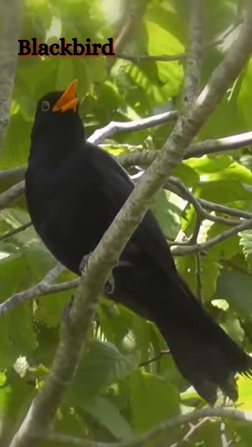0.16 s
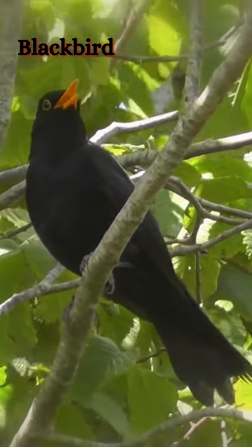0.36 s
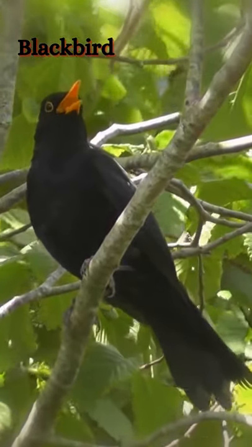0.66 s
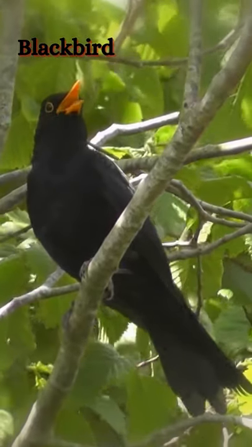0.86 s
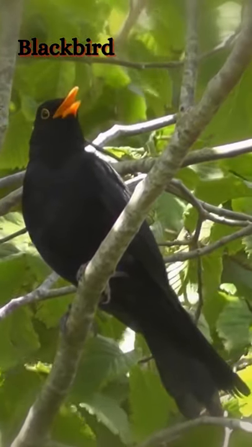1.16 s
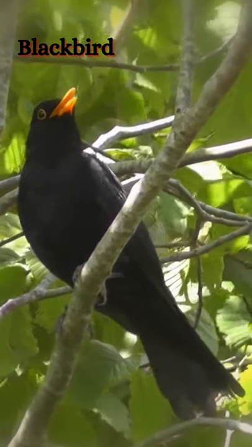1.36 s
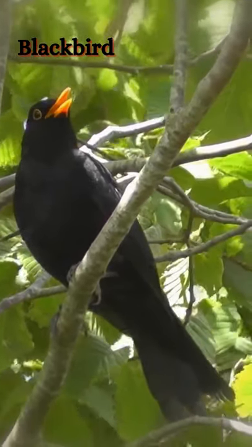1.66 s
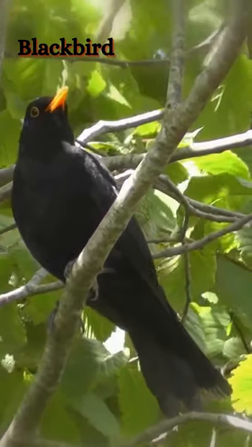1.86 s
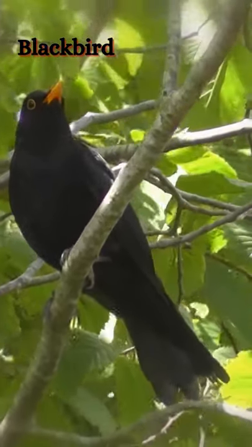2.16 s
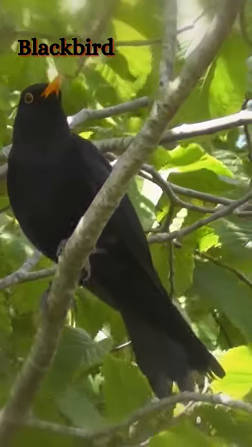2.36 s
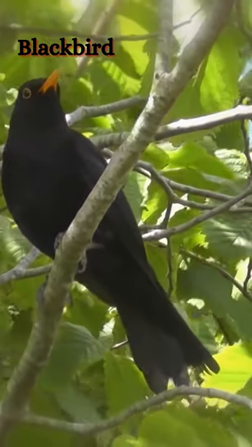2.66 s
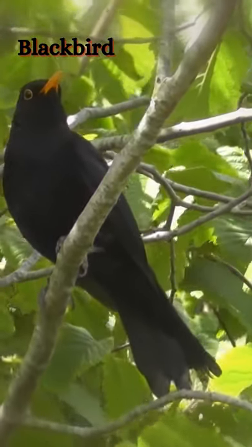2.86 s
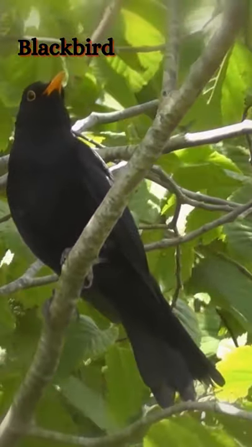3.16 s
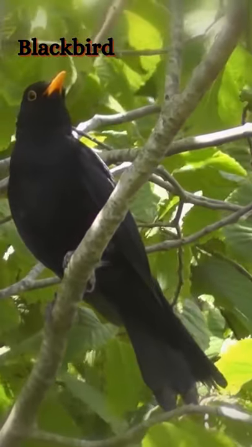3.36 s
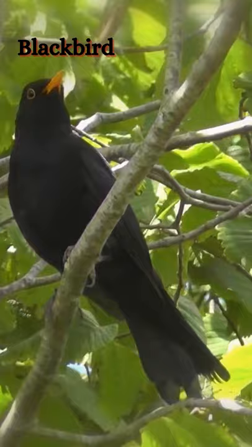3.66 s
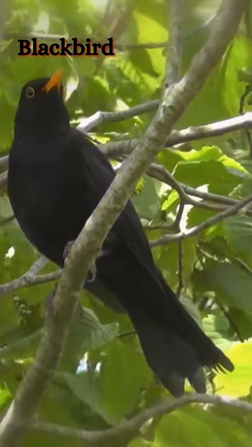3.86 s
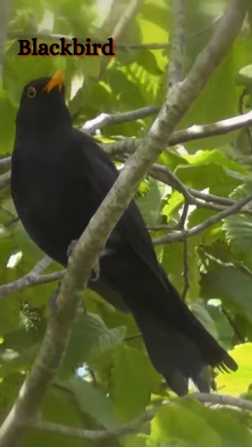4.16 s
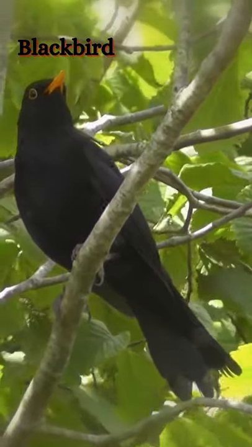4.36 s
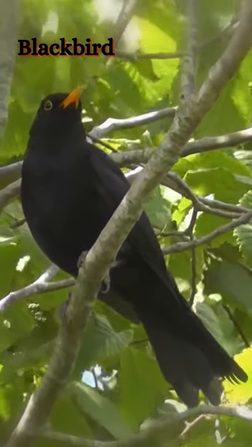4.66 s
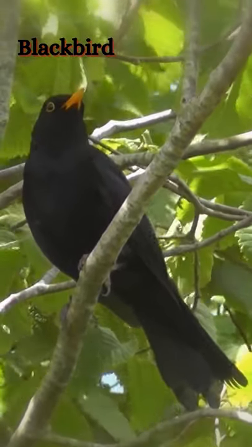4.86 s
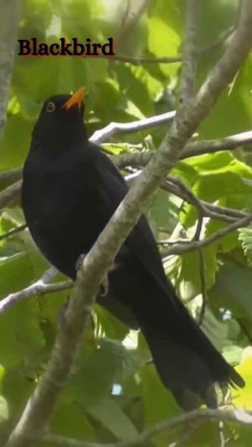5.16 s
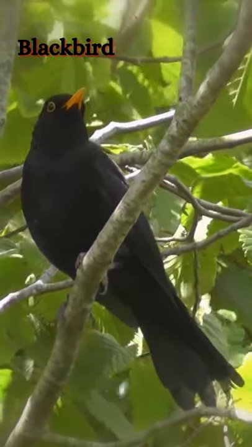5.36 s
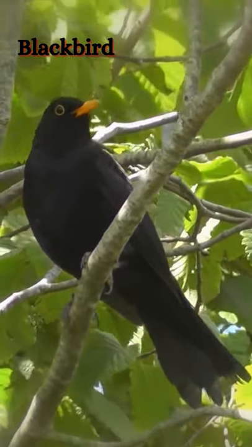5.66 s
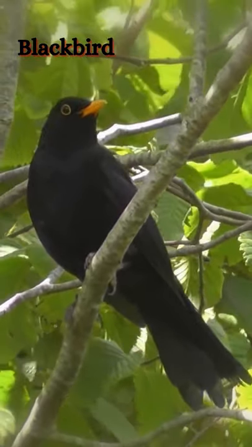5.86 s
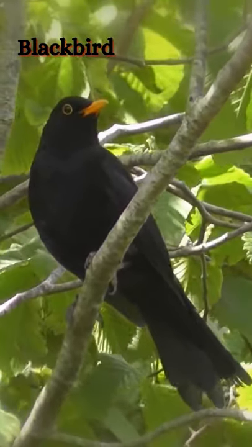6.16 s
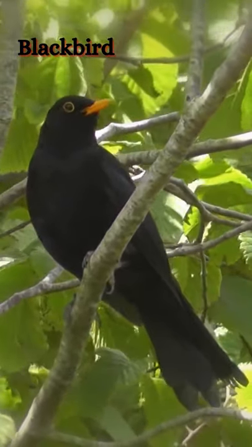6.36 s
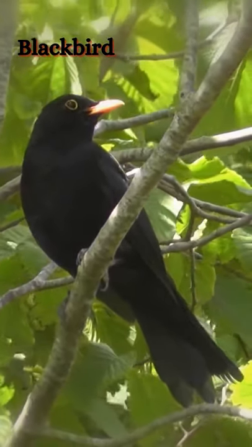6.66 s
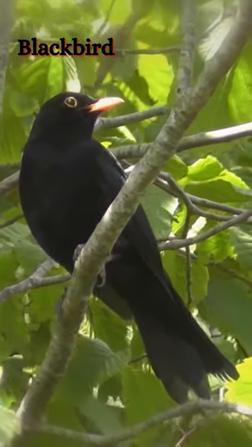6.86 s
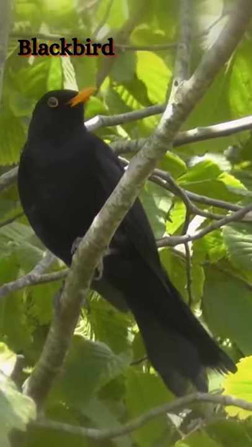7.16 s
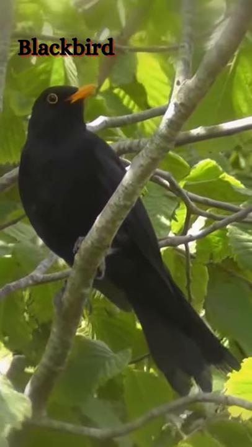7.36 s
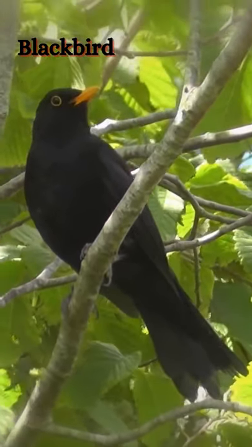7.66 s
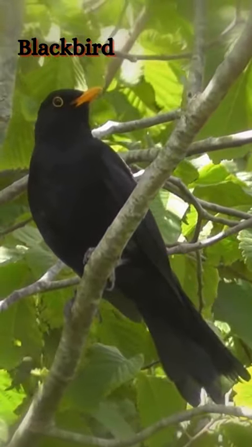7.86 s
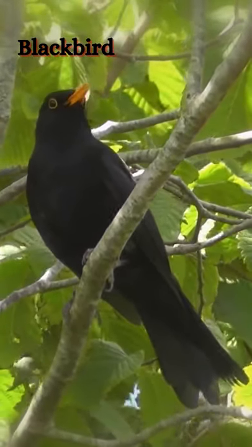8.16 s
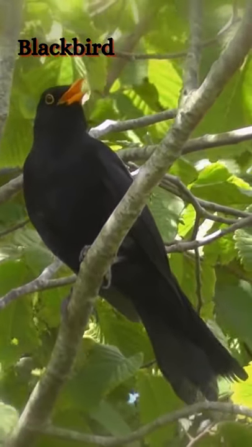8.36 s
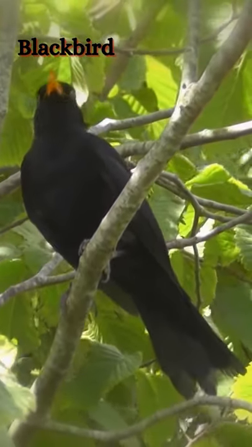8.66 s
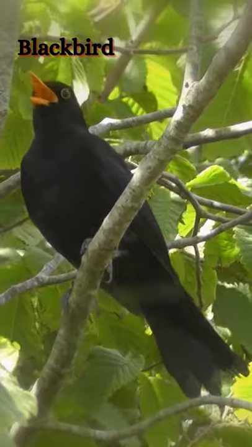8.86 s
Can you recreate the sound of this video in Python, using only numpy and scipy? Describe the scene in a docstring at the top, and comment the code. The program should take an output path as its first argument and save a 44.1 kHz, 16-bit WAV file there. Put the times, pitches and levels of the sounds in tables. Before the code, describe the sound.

A male blackbird sings from a branch close to the microphone. A mellow whistle with a fluttering upper voice breaks into buzzes, clicks and squeaky notes; after a short gap comes a warble, a long pure whistle, a stuttering run and a thin chirp. During the pause small birds call with echo deep in the wood over a soft hush, before a quieter raspy phrase starts.

```python
"""A blackbird sings from a branch close by: fluty whistles, warbles and buzzes from the two sides of its syrinx,
then a thin chirp with fainter repeats. Each note is a swept sine with weak overtones and a breath of hiss;
branches scatter it. Small birds answer from deeper in the wood with sliding tones, mostly heard as echo.
Beneath lie a soft outdoor hush and breeze of coloured noise, a faint far drone and a few low bumps."""
import sys
import numpy as np
from scipy import signal
from scipy.fft import rfft, irfft
from scipy.io import wavfile
from scipy.ndimage import uniform_filter1d, map_coordinates

SR = 44100
rng = np.random.default_rng(int(sys.argv[2]) if len(sys.argv) > 2 else 0)


def persist_wave(psi):
    """Save psi, clipped to +-1, as 16-bit WAV."""
    counts = np.round(np.clip(psi, -1, 1) * 32767).astype(np.int16)
    wavfile.write(sys.argv[1], SR, np.atleast_2d(counts).T)


N = 397341
TIME = np.arange(N) / SR

# reverberation of the far wood: f/Hz, time to fall 60 dB/s
FAR_DECAY = [(3000, 1.7), (5000, 1.62), (8000, 0.46)]


def gain_of(db):
    """Decibels to gain."""
    return 10 ** (np.asarray(db) / 20)


def evened(x):
    """Scales to rms 1."""
    return x / np.sqrt(np.mean(x ** 2) + 1e-20)


def read(points, hz):
    """Reads a table on a log-frequency axis."""
    f, value = np.transpose(points)
    return np.interp(np.log(hz + 1), np.log(f + 1), value)


def add(mix, s, sound):
    """Adds a sound to the mix at time s, cutting whatever falls outside it."""
    start = round(s * SR)
    sound = sound[max(-start, 0):]
    part = mix[max(start, 0):][:len(sound)]
    part += sound[:len(part)]


def coloured(x, colour):
    """Filters by a table of dB over frequency."""
    n = x.shape[-1]
    hz = np.fft.rfftfreq(n, 1 / SR)
    return irfft(rfft(x) * gain_of(read(colour, hz)), n)


def wander(n, rate):
    """Smooth chance of rms near 1, changing about rate times a second."""
    points = rng.standard_normal(256)
    return map_coordinates(points, [np.arange(n) * rate / SR], order=3, mode="mirror")


def flutter(size):
    """Random swing of rms 1, smoothed twice over size samples."""
    smooth = uniform_filter1d(rng.standard_normal(N), size=size)
    return evened(uniform_filter1d(smooth, size=size))


def clock(length):
    """Time within a note, in seconds and as a share of its length."""
    t = np.arange(0, max(length, .003), 1 / SR)
    return t, t / t[-1]


def dome(u):
    """1 at both ends of a note, 0 in its middle."""
    return (2 * u - 1) ** 2


def bow(u, from_hz, middle_hz, to_hz):
    """A smooth pitch arc through the start, middle and end of a note."""
    straight = from_hz + (to_hz - from_hz) * u
    return straight + (middle_hz - (from_hz + to_hz) / 2) * (1 - dome(u))


def fade(t, edge):
    """Opens and shuts a note within edge seconds."""
    return np.sin(np.pi / 2 * np.clip(np.minimum(t, t[-1] - t) / edge, 0, 1)) ** 2


def ramps(t, attack, release):
    """Straight-line attack and release, in seconds."""
    return np.clip(t / attack, 0, 1) * np.clip((t[-1] - t) / release, 0, 1)


def syrinx(t, hz, db, overtone_db, third_db=-6, fourth_db=-24, waver=0.0064, edge=0.002):
    """A nearly pure tone: the throat lets only weak overtones out."""
    throat_top_hz = 12300  # overtones die out above this
    hz = hz * (1 + waver * wander(len(t), 300.5))
    phase = 2 * np.pi * np.cumsum(hz) / SR
    overtones = 0
    for k, level in enumerate([0, third_db, fourth_db], 2):
        passed = (k * hz < SR / 2) / (1 + (k * hz / throat_top_hz) ** 20)
        overtones = overtones + gain_of(level) * np.sin(k * phase) * passed
    tone = np.sin(phase) + gain_of(overtone_db) * overtones
    return np.sqrt(2) * gain_of(db) * tone * fade(t, min(edge, t[-1] / 4))


def scatter(x, decay, onset, likeness=0.99):
    """Countless small echoes that swell and die, nearly alike in both channels."""
    taps = rng.standard_normal((3, SR)) * (rng.random((3, SR)) < 3000 / SR)
    taps = np.sqrt(likeness) * taps[0] + np.sqrt(1 - likeness) * taps[1:]
    hz, t, z = signal.stft(taps * (1 - np.exp(-TIME[:SR] / onset)), SR, nperseg=256)
    dying = gain_of(-60 * t / read(decay, hz)[:, None])
    tail = signal.istft(z * dying, SR, nperseg=256)[1]
    return signal.fftconvolve(x[None], tail / np.linalg.norm(tail[0]), axes=1)[:, :N]


def echo(x, delay, db):
    """One reflection."""
    return gain_of(db) * np.interp(TIME - delay, TIME, x, left=0)


def air(colour, patchy_db):
    """Stereo noise of rms 1 with drifting patches in time and frequency."""
    # left-right likeness of the air noise: f/Hz, correlation
    alike = [(50, 0.82), (300, 0.99), (800, 0.89), (2000, 0.69), (5000, 1), (9000, 0.089), (14000, 0.3)]
    frames, hz = N // 512 + 5, np.fft.rfftfreq(2048, 1 / SR)
    a, b, c, d, patches = rng.standard_normal((frames, len(hz), 5)).T
    patches = uniform_filter1d(patches, size=12, axis=0)
    patches = evened(uniform_filter1d(patches, size=10, axis=1))
    same = np.clip(read(alike, hz), -1, 1)[:, None]
    left = a + 1j * b
    right = same * left + np.sqrt(1 - same ** 2) * (c + 1j * d)
    z = np.array([left, right]) * gain_of(read(colour, hz)[:, None] + patchy_db * patches)
    return evened(signal.istft(z, nperseg=2048, noverlap=1536)[1][:, :N])


def outdoors():
    """Coloured noises: a hush, a low breeze that swells in gusts and the blur of very distant birdsong."""
    # spectra of the hush, the breeze and the distant birds: f/Hz, relative level/dB
    hush_colour = [(15, -35.5), (25, 6.5), (55, -7), (107, -3), (281, 3), (349, -22.5), (703, -6),
                   (1110, -11), (1660, -13.5), (2060, -17), (3090, -13), (3930, -18.5), (5580, -15),
                   (9550, -31.5), (15500, -29.5)]
    breeze_colour = [(60, -30.5), (150, -7), (270, -0.5), (450, -1), (750, -6.5), (1200, -17.5),
                     (2500, -45)]
    chorus_colour = [(2000, -23.5), (3300, -20), (4500, 5), (6000, 0), (7200, 5), (8500, -30.5),
                     (12000, -31.5)]
    # gusts: t/s, half width/s, rise/dB
    gusts = [(3.85, 0.23, 5.5), (4.35, 0.2, 10), (6.65, 0.54, 5), (8.302, 1, 3.5)]
    hush_db, breeze_db, chorus_db = -49, -50, -60.5
    gusts_db = sum(db * np.exp(-((TIME - s) / width) ** 2) for s, width, db in gusts)
    breeze = gain_of(breeze_db + gusts_db) * air(breeze_colour, patchy_db=2.0)
    hush = gain_of(hush_db) * air(hush_colour, patchy_db=2.5)
    chorus = gain_of(chorus_db) * air(chorus_colour, patchy_db=6.5)
    return hush + breeze + chorus


def rumble():
    """The wavering drone, a sine with its third harmonic, and dull bumps of low noise."""
    # a far drone holds one pitch after another: from t/s, f/Hz, level/dB
    drone = [(0, 53, -50), (.8, 46, -62), (2.152, 73, -58), (3.002, 71.4, -55.5), (4.6, 70, -60.5),
             (5.8, 70.5, -58.5), (6.75, 44, -59.5), (7.3, 55, -59.5)]
    # soft low bumps: t/s, length/s, peak level/dB
    bumps = [(2.977, 0.065, -45.5), (3.297, 0.07, -43.5), (4.872, 0.15, -48), (5.018, 0.061, -38),
             (5.64, 0.39, -48), (8.32, 0.12, -49), (8.776, 0.15, -48.5)]
    # spectrum of the bumps: f/Hz, relative level/dB
    bump_colour = [(20, -44), (40, -27), (60, -14), (100, -13.5), (150, -20), (300, -25.5), (900, -68)]
    s, hz, db = np.transpose(drone)
    step = np.searchsorted(s[1:], TIME)
    hz, db = uniform_filter1d(np.array([hz[step], db[step]]), size=4000)  # soften the steps
    phase = 2 * np.pi * np.cumsum(hz * (1 + .012 * wander(N, 5.6))) / SR
    level = gain_of(db + 1.5 * wander(N, 5.2))
    low = np.sqrt(2) * level * (np.sin(phase) + gain_of(-6) * np.sin(3 * phase))
    swell = np.zeros(N)
    for start, length, level_db in bumps:
        add(swell, start, gain_of(level_db) * np.hanning(round(length * SR)))
    return low + swell * evened(coloured(rng.standard_normal(N), bump_colour))


def slur(length, from_hz, to_hz, settle, db, waver=0.0058):
    """A small bird's stroke slides quickly and settles on its last pitch."""
    t, u = clock(length)
    detune = 1 + 0.00418 * rng.standard_normal()
    hz = (to_hz + (from_hz - to_hz) * np.exp(-t / settle)) * detune
    return syrinx(t, hz, db, overtone_db=-38.5, waver=waver, edge=0.0022)


def far_series(count=8):
    """A far bird's even series of count down-sweeps, each returned by three crisp echoes and a long tail."""
    # crisp echoes: delay/s, level/dB
    crisp_echoes = [(0.0481, 0.5), (0.0663, -3), (.122, -8)]
    start_s, spacing_s, sweep_s = 7.704, .0926, .04
    top_hz, end_hz = 5720, 3800
    sweep_db, dome_db = -49.5, 2  # level ahead of the flutter
    song, (t, u) = np.zeros(N), clock(sweep_s)
    for k in range(count):
        level = sweep_db - dome_db * dome(u) + 3 * wander(len(t), 200)
        sweep = syrinx(t, top_hz * (end_hz / top_hz) ** u, level, overtone_db=-37)
        add(song, start_s + k * spacing_s, sweep)
    crisp = song + sum(echo(song, delay, db) for delay, db in crisp_echoes)
    crisp = crisp * gain_of(2.4 * flutter(400) - 2)
    return crisp + gain_of(-1.5) * scatter(song, FAR_DECAY, onset=0.0046)


def far_birds():
    """Tumbles, sliding strokes and held whistles; the way through the leaves makes them flutter."""
    # levels in these tables stand ahead of the echoes and the flutter
    # steep sliding strokes, most of them falling: t/s, length/s, from f/Hz, to f/Hz, level/dB
    tumbles = [(2.037, 0.083, 7000, 5890, -48.5), (2.075, 0.062, 6030, 3350, -54),
               (2.109, .016, 6350, 3920, -48.5), (2.419, 0.065, 6800, 4550, -48.5),
               (2.452, 0.066, 6900, 4710, -44.5), (2.53, .03, 5620, 4190, -49.5),
               (2.552, 0.017, 4870, 5620, -50), (2.62, 0.018, 5000, 5580, -56),
               (2.482, 0.03, 6740, 3930, -48.5), (2.795, 0.061, 7000, 6020, -45.5),
               (2.826, 0.051, 4530, 3320, -49), (2.849, 0.026, 6600, 3940, -48),
               (3.169, 0.084, 6300, 4110, -50.5), (3.203, 0.051, 6420, 3866, -45),
               (3.505, 0.018, 6640, 4940, -53), (3.53, 0.089, 6620, 4855, -43.5),
               (4.307, 0.024, 6450, 3900, -45.5), (4.342, 0.0204, 6220, 3960, -47),
               (4.439, 0.048, 6200, 4550, -47), (4.5, 0.033, 5200, 3950, -57),
               (4.817, 0.038, 5580, 4250, -54), (4.655, 0.026, 3190, 3960, -55.5),
               (4.663, 0.028, 3180, 2690, -70)]
    # sliding strokes, single or evenly repeated, some of the repeats being echoes:
    # t/s, number of strokes, spacing/s, from f/Hz, to f/Hz, level/dB
    slides = [(2.56, 1, 0.12, 5560, 4860, -56), (4.927, 2, 0.092, 5400, 6110, -54),
              (5.388, 4, 0.08, 5420, 6310, -54), (5.7, 2, 0.052, 5400, 3200, -55.5),
              (5.939, 4, 0.041, 7650, 6620, -56), (6.363, 1, .1, 6420, 7850, -56),
              (6.43, 2, 0.11, 3030, 3930, -59), (6.721, 2, 0.036, 3510, 4580, -56.5),
              (6.85, 3, 0.14, 3890, 2620, -59), (6.87, 5, 0.12, 8050, 5260, -58.5),]
    # whistles that drop onto a held pitch: t/s, length/s, held f/Hz, level/dB
    held = [(3.266, 0.18, 4590, -55.5), (3.421, .14, 4690, -57), (4.549, 0.24, 6890, -60),
            (4.754, 0.13, 4264, -53.5), (4.9, 0.29, 4265, -61.5), (5.205, 0.16, 6980, -57.5),
            (5.836, 0.1, 4174, -50), (6.603, 0.12, 5050, -50), (7.475, 0.2, 4944, -53.5)]
    tumble_settle_s = 0.008
    stroke_s, stroke_settle_s = 0.051, .033
    drop_ratio, drop_settle_s = 1.22, 0.011
    song = np.zeros(N)
    for s, length, from_hz, to_hz, db in tumbles:
        add(song, s, slur(length, from_hz, to_hz, tumble_settle_s, db, waver=.022))
    smear = scatter(song, [(3000, .07), (8000, .06)], onset=.001)[0]
    song = gain_of(-2.5) * song + gain_of(-4.5) * smear
    for s, strokes, spacing, from_hz, to_hz, db in slides:
        for k in range(round(strokes)):
            stroke = slur(stroke_s, from_hz, to_hz, stroke_settle_s, db, waver=0.0077)
            add(song, s + k * spacing, stroke)
    for s, length, hz, db in held:
        add(song, s, slur(length, drop_ratio * hz, hz, drop_settle_s, db))
    return song * gain_of(2 * flutter(200) - .5)


def thin_whistle():
    """A thin, very high slur from a nearer tree slides onto its pitch, swells and fades."""
    length_s, settle_s, fade_s = 0.32, 0.033, .09
    from_hz, to_hz = 8630, 8255
    peak_db, dome_db = -39.5, 15
    t, u = clock(length_s)
    tone = slur(length_s, from_hz, to_hz, settle_s, peak_db - dome_db * dome(u), waver=0.0028)
    return tone * np.clip((t[-1] - t) / fade_s, 0, 1)


def overtone(db):
    """The louder the note, the purer it is: its overtone drops 1.1 dB for each dB above -24."""
    return np.clip(-33 - 1.1 * (db + 24), -43, -19)


def shaken(t, hz, db, swing, rate, overtone_db):
    """A tremor of the syrinx shakes pitch and level; the wider it swings, the more ragged it gets."""
    rough = min(swing / 180, 1)  # fully ragged from a swing of 180 Hz
    uneven_rate = rate * (1 + 0.415 * rough * wander(len(t), rate))
    shake = np.sin(2 * np.pi * np.cumsum(uneven_rate) / SR)
    hz = hz + swing * (shake + .75 * rough * wander(len(t), 300))
    level = db + 0.7 * shake + 5.54 * rough * wander(len(t), 195.5)
    return syrinx(t, hz, level, overtone_db, third_db=-16.5, fourth_db=-28.5, edge=0.0072)


def sharp_notes():
    """Click-like falling flicks and hoarse, shaken squeaks that climb and level off."""
    # flicks: t/s, level at the start/dB
    flicks = [(0.349, -16.5), (.507, -20.5), (0.905, -39), (0.966, -38)]
    # squeaks: t/s, level/dB
    scratches = [(1.187, -35.5), (1.318, -35.5)]
    # two upstrokes and a ragged top: t after the start/s, length/s, from f/Hz, to f/Hz, level/dB, swing/Hz
    scratch_parts = [(0, 0.0208, 4550, 5600, -2, 70), (0.019, .017, 4190, 7080, 0.5, 90),
                     (0.027, .025, 6670, 6620, -1.5, 300)]
    flick_s, top_hz, end_hz = 0.00665, 6240, 3200
    song = np.zeros(N)
    for s, db in flicks:
        t, u = clock(flick_s)
        add(song, s, syrinx(t, top_hz + (end_hz - top_hz) * u, db - 6 * u, overtone_db=-21.5))
    for s, db in scratches:
        for after, length, from_hz, to_hz, part_db, swing in scratch_parts:
            t, u = clock(length)
            hz = from_hz + (to_hz - from_hz) * u
            add(song, s + after, shaken(t, hz, db + part_db, swing, rate=400, overtone_db=-13.5))
    return song


def thin_chirp():
    """A thin chirp that creeps up, grows louder and snaps down, then fainter echo-like repeats."""
    # the chirp and its repeats: t/s, length/s, level at the end/dB
    chirps = [(3.927, 0.045, -33), (3.979, 0.022, -36), (3.993, 0.018, -42), (4.027, 0.024, -39),
              (4.048, 0.034, -43), (4.094, .02, -48)]
    # pitch of a chirp: share of its length, f/Hz
    chirp_pitch = [(0, 6440), (.8, 7300), (1, 5800)]
    growth_db = 13.5
    song = np.zeros(N)
    for s, length, db in chirps:
        t, u = clock(length)
        hz = np.interp(u, *np.transpose(chirp_pitch))
        add(song, s, syrinx(t, hz, db + growth_db * (u - 1), overtone_db=-21))
    return song


def tsips():
    """Both sides of the syrinx sound at once: a near-steady low voice under one that dips and climbs back."""
    # calls: t/s, level of the low voice/dB
    calls = [(1.528, -29.5), (1.699, -31.5)]
    # pitch of the upper voice: t after the start/s, f/Hz
    upper = [(-.007, 7100), (.005, 5510), (0.034, 5800), (0.074, 5904)]
    low_hz, low_s, low_bow, upper_db = 4700, 0.0435, 0.02, -4.5
    song, (after, hz) = np.zeros(N), np.transpose(upper)
    for s, db in calls:
        t, u = clock(low_s)
        add(song, s, syrinx(t, low_hz * (1 + low_bow * dome(u)), db, overtone_db=-30))
        t, u = clock(after[-1] - after[0])
        upper_hz = np.interp(t + after[0], after, hz)
        add(song, s + after[0], syrinx(t, upper_hz, db + upper_db, overtone_db=-17.5, edge=0.0073))
    return song


def grates():
    """The tremor is so wide and quick that each burst spreads into a rasp."""
    # bursts: t/s, length/s, f/Hz, level/dB
    bursts = [(0.752, 0.026, 2444, -26), (0.776, 0.0282, 2570, -27), (0.805, 0.0344, 2743, -27),
              (8.485, 0.028, 2513, -33), (8.508, 0.03, 2820, -29.5), (8.531, 0.0273, 2830, -31),
              (8.553, 0.029, 2850, -32.5), (8.576, 0.026, 2787, -34.5)]
    # the pitch leaps and sinks: share of the burst, offset/Hz
    arch = [(0, -200), (.3, 171), (1, -170)]
    swing_hz, rate, jitter = 255, 190, 0.16  # rate in shakes per s
    throb_db, fade_db = -1.5, 5.5
    song = np.zeros(N)
    for s, length, hz, db in bursts:
        t, u = clock(length)
        shake = np.sin(2 * np.pi * np.cumsum(rate * (1 + jitter * wander(len(t), rate))) / SR)
        pitch = hz + np.interp(u, *np.transpose(arch)) + swing_hz * shake
        level = db + throb_db * shake - fade_db * (u - .5)
        add(song, s, syrinx(t, pitch, level, overtone_db=-25.5, third_db=-27, edge=0.0048))
    return song


def climb():
    """The opening buzz ends in pulses that run together as the shaking pitch shoots up."""
    start_s, length_s, pulses_per_s = .304, .031, 160
    low_hz, top_hz, peak_db = 3150, 7530, -28
    song, (t, u) = np.zeros(N), clock(length_s)
    cycle = t * pulses_per_s % 1
    hz = (low_hz + (top_hz - low_hz) * u ** 1.7) * (1 - 0.039 * np.sin(2 * np.pi * cycle))
    add(song, start_s, syrinx(t, hz, peak_db - 14 * (1 - u) * dome(cycle), overtone_db=-27))
    return song


def buzzes():
    """Notes on a straight glide, shaken by a tremor: slow is a vibrato, fast is a buzz."""
    # t/s, length/s, start f/Hz, end f/Hz, level/dB, swing/Hz, shakes per s
    notes = [ (0.045, 0.1, 4180, 4370, -47, 170, 170), (0.15, .15, 4180, 4150, -47.5, 330, 380),
             (0.102, 0.02, 2203, 2170, -26, 60, 170), (.125, 0.053, 2310, 2350, -42, 157, 145),
             (0.183, 0.124, 2375, 2360, -33, 116, 140), (0.195, 0.068, 2920, 2940, -34.5, 132, 110),
             (0.267, 0.024, 3130, 3090, -28.5, 101, 120), (0.288, .015, 2880, 3020, -26, 80, 120),
             (0.471, 0.02, 5080, 7520, -34, 170, 155), (0.968, 0.035, 2560, 2553, -37, 49.6, 100),
             (1.014, 0.077, 1720, 1610, -37.5, 99, 110), (1.065, 0.052, 1656, 1838, -36, 98, 93),
             (1.4, 0.037, 4280, 2630, -45.5, 250, 148), (3.102, 0.051, 1800, 1732, -35, 61.3, 110),
             (3.151, 0.034, 1763, 1707, -32, 60, 130), (3.609, 0.114, 2600, 2440, -37, 93, 36),
             (3.71, 0.09, 3070, 2780, -48, 71, 49), (3.714, 0.082, 1530, 1413, -38, 45, 53),
             (8.274, 0.076, 1630, 2104, -41, 25, 64), (8.439, 0.059, 2106, 2127, -38, 99.5, 120),
             (8.502, 0.09, 2290, 2343, -37, 109, 240), (8.594, 0.091, 2880, 2920, -47.5, 138, 150),
             (8.728, 0.17, 1784, 1853, -38.5, 82, 45)]
    song = np.zeros(N)
    for s, length, from_hz, to_hz, db, swing, rate in notes:
        t, u = clock(length)
        hz = from_hz + (to_hz - from_hz) * u
        add(song, s, shaken(t, hz, db, swing, rate, overtone_db=-25.5))
    return song


def warble():
    """One unbroken note on a sawtooth pitch: each tooth leaps up and slides down, slower than the last."""
    start_s, length_s = 2.801, .124
    low_hz, high_hz = 1704, 2434
    first_tooth_s, slowing, leap = .022, .887, 0.2  # leap: share of a tooth spent rising
    peak_db, dip_db = -22, 4  # loudest midway between low and high
    song, (t, u) = np.zeros(N), clock(length_s)
    tooth = np.interp((t / first_tooth_s) ** slowing % 1, [0, leap, 1], [0, 1, 0])
    hz = low_hz * (high_hz / low_hz) ** tooth
    add(song, start_s, syrinx(t, hz, peak_db - dip_db * dome(tooth), overtone(peak_db)))
    return song


def stutter():
    """A run chopped into short pulses; each swells, and its pitch droops at the end."""
    # t/s, length/s, f at the start/Hz, rough level/dB
    pulses = [(3.447, 0.03, 2356, -16.5), (3.489, 0.034, 2364, -15), (3.538, 0.035, 2322, -15),
              (3.583, 0.03, 2182, -16.5), (3.623, 0.021, 1907, -19.5), (3.65, 0.025, 1834, -22),
              (3.673, 0.022, 1760, -24), (3.697, 0.017, 1656, -28)]
    droop, droop_bend, swell_db, dome_db = 0.12, 3.6, 4, 3
    song = np.zeros(N)
    for s, length, hz, db in pulses:
        t, u = clock(length)
        level = db + swell_db * (u - .5) - dome_db * (dome(u) - .5)
        drooping_hz = hz * (1 - droop * u ** droop_bend)
        add(song, s, syrinx(t, drooping_hz, level, overtone_db=-34.5, third_db=-6.5, edge=0.0043))
    return song


def throbs():
    """The upper voice over the opening whistle swells and chokes in a slow flutter, growing as it goes."""
    start_s, length_s, throbs_per_s = .0255, .167, 42
    top_hz, swing_hz = 3046, 44.6
    peak_db, dip_db = -23.5, 18.5
    song, (t, u) = np.zeros(N), clock(length_s)
    choke = dome(t * throbs_per_s % 1)
    hz = top_hz + swing_hz * (wander(len(t), 202) - choke)
    level = peak_db - dip_db * choke - 6 * (1 - u) ** 3 + 0.77 * wander(len(t), 130)
    add(song, start_s, syrinx(t, hz, level, overtone_db=-23.5, third_db=-19.0))
    return song


def glides():
    """The other side of the syrinx joins a slur a little off pitch, and the two beat unevenly."""
    # t/s, length/s, start f/Hz, middle f/Hz, end f/Hz, level/dB, attack/s, second side joins after/s, beats per s
    notes = [(0.366, 0.069, 2996, 3017, 2466, -23, 0.028, .034, 134),
             (0.51, 0.067, 2990, 2974, 2454, -23, 0.019, 0.029, 98),
             (.838, 0.13, 2740, 2674, 2467, -27, 0.0051, 0, 88),
             (8.367, 0.078, 2793, 2360, 2100, -30, 0.004, 0.021, 101),
             (8.947, .11, 2647, 2770, 2880, -26.5, 0.041, 0, 190)]
    twin_db, overtone_db = -4, -20
    entry_s, release_s, beat_wander = 0.0045, 0.0047, 0.21
    song = np.zeros(N)
    for s, length, from_hz, middle_hz, to_hz, db, attack, joins, beats in notes:
        t, u = clock(length)
        hz = bow(u, from_hz, middle_hz, to_hz)
        joined = np.clip((t - joins) / entry_s, 0, 1)
        twin_hz = hz + joined * beats * (1 + beat_wander * wander(len(t), 61))
        first = syrinx(t, hz, db, overtone_db, third_db=-13.5)
        twin = joined * syrinx(t, twin_hz, db + twin_db, overtone(db))
        add(song, s, (first + twin) * ramps(t, attack, release_s))
    return song


def whistles():
    """Fluty notes on a pitch arc, sagging in level, with faint higher partials and mixture tones over some."""
    # t/s, length/s, start f/Hz, middle f/Hz, end f/Hz, level ahead of the sag/dB, attack/s
    notes = [ (-.01, 0.12, 2170, 2143, 2152, -12.5, 0.016), (0.353, 0.043, 4630, 5090, 5160, -30.5, 0.021),
             (0.425, 0.04, 2475, 2362, 2310, -31.5, .004), (0.499, .046, 4750, 5070, 5170, -33, 0.019),
             (0.672, 0.069, 1816, 2053, 2080, -32.5, 0.035), (0.866, .04, 6450, 6020, 5700, -45, .012),
             (.93, .04, 6300, 6000, 5940, -50.5, .008), (1.04, .027, 3560, 3760, 3800, -43.5, .012),
             (1.135, 0.038, 3860, 4250, 4450, -50, .012), (2.766, 0.035, 2450, 2650, 2870, -45, 0.015),
             (2.922, 0.051, 1980, 1990, 1810, -20.5, 0.0045), (2.972, .215, 2452, 2436, 2448, -11.5, .055),
             (3.106, .08, 3470, 3430, 3370, -44, 0.013), (3.111, 0.069, 4220, 4200, 4150, -49, .02),
             (3.393, 0.039, 2140, 2186, 2085, -16.5, 0.023),
             (3.927, 0.0436, 3660, 3830, 3650, -28.5, 0.036), (3.969, 0.031, 3204, 3740, 3430, -30, 0.0029),
             (4.003, 0.022, 3500, 3750, 4000, -39.5, 0.0017), (4.035, 0.012, 3830, 3940, 3940, -41, 0.0037),
             (4.217, .014, 3920, 4600, 8000, -31.5, 0.0063), (8.658, 0.068, 2067, 2006, 1800, -27.5, 0.07)]
    sag_db_per_s, release_s = 30.5, 0.0035  # a note sags as the air runs out
    drift, drift_db, drift_per_s = 0.0059, 2, 45.2  # no note is held quite steady
    song = np.zeros(N)
    for s, length, from_hz, middle_hz, to_hz, db, attack in notes:
        t, u = clock(length)
        unsteady = min(gain_of(.6 * (-24 - db)), 1.3)  # loud notes are steadier
        hz = bow(u, from_hz, middle_hz, to_hz)
        hz = hz * (1 + unsteady * drift * wander(len(t), drift_per_s))
        level = db - sag_db_per_s * t + unsteady * drift_db * wander(len(t), drift_per_s)
        tone = syrinx(t, hz, level, overtone(db))
        add(song, s, tone * ramps(t, attack, release_s))
    return song


def throat(song, spill):
    """The two voices mix into sum and difference tones, and the air that drives them hisses."""
    # spectrum of the air hiss: f/Hz, relative level/dB
    rasp_colour = [(1000, -38), (2000, -4), (3000, 6.5), (4300, -1), (6000, -0.5), (8500, -21.5),
                   (10500, -11.5), (13000, -37)]
    mixing_colour = [(800, -59.0), (1600, 1), (3000, 14.0), (4250, -6), (5000, -2), (7000, -23.0)]  # f/Hz, dB
    mixing = gain_of(-19) * song ** 2 + gain_of(-16) * song ** 3
    flow = np.sqrt(abs(uniform_filter1d(spill ** 2, size=200)))
    hiss = flow * evened(coloured(rng.standard_normal(N), rasp_colour))
    return song + coloured(mixing, mixing_colour) + hiss


def blackbird():
    """All the notes pass the throat; rough and sharp ones spill more air."""
    clean = whistles() + glides() + throbs() + stutter() + warble() + tsips() + thin_chirp()
    rough = buzzes() + climb() + grates()
    voices = np.array([clean, rough, sharp_notes()])
    spill = gain_of([-35.5, -21.5, -16]) @ voices  # air hiss under each kind, dB re the tone
    return throat(voices.sum(0), spill)


def scene():
    """The near bird is almost dry; the far ones are mostly echo."""
    # head turned away: t/s, echo gain/dB
    aside = [(0, 1.5), (.9, 5.5), (3.1, -3.5), (4.1, 1), (8.3, 7.5)]
    # what leaves throw back: f/Hz, gain/dB
    leaf_scatter = [(1500, -5.5), (2300, -5.5), (3000, -2), (5000, -4), (7000, 6), (12000, -0.5)]
    # echoes from nearby branches, later echoes, and echoes from the edge of the wood: delay/s, level/dB
    branch_echoes = [(.0031, -28.5), (.0068, -23), (.0105, -24), (.0143, -25.5), (0.021, -21), (.028, -25)]
    trunk_echoes = [(0.035, -27.5), (0.097, -29.5), (.2, -55.5)]
    far_echoes = [(.048, -3.5), (.068, -11), (.12, -13)]
    # reverberation of the wood round the near bird: f/Hz, time to fall 60 dB/s
    wood_decay = [(1500, 1), (3000, 0.53), (5000, 0.98), (8000, 0.92), (12000, 0.18)]
    near, far = blackbird(), far_birds()
    # leaves throw back short waves best, and more of them when the beak points aside
    thrown = coloured(near * gain_of(np.interp(TIME, *np.transpose(aside))), leaf_scatter)
    add(near, 6.755, thin_whistle())  # stays dry
    branches = sum(echo(thrown, delay, db) for delay, db in branch_echoes)
    trunks = sum(echo(thrown, delay, db) for delay, db in trunk_echoes)
    crown = gain_of(-8.5) * scatter(thrown, [(1500, 0.18), (8000, 0.17)], onset=0.00065, likeness=0.78)
    wood = gain_of(-21) * scatter(thrown, wood_decay, onset=0.055, likeness=0.95)
    blurred = scatter(far, [(3000, .09), (8000, .07)], onset=.002, likeness=1)[0]
    distant = gain_of(1.5) * (far + sum(echo(blurred, delay, db) for delay, db in far_echoes))
    distant = distant + scatter(far, FAR_DECAY, onset=0.0048)
    return near + branches + trunks + crown + wood + distant + far_series() + outdoors() + rumble()


def record(dry):
    """A slight lean to the right, then a steep low-pass at the band limit."""
    edge_hz = 15800
    leaning = dry * gain_of([[-.12], [.12]])
    low_pass = signal.firwin(511, edge_hz, window=("kaiser", 9), fs=SR)
    return signal.oaconvolve(leaning, low_pass[None], "same")


dry = scene()
out = record(dry)
persist_wave(out)
```